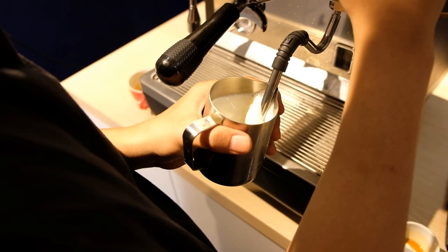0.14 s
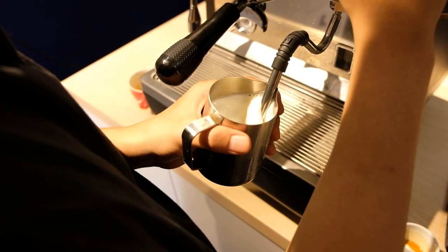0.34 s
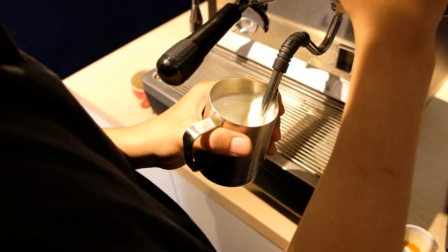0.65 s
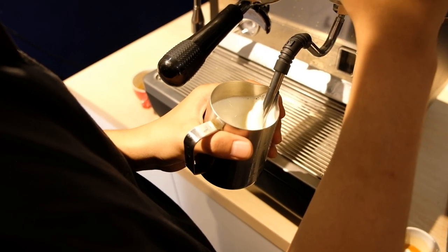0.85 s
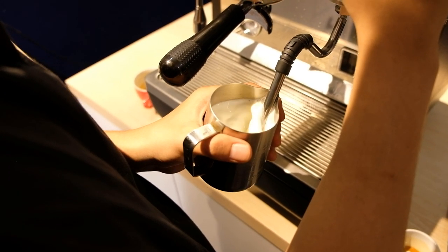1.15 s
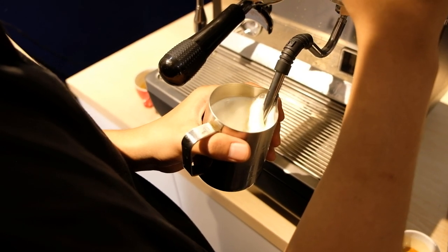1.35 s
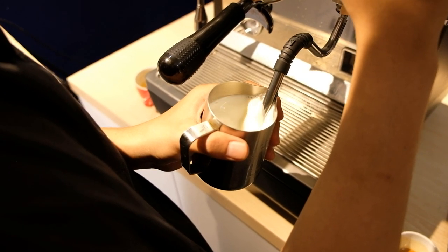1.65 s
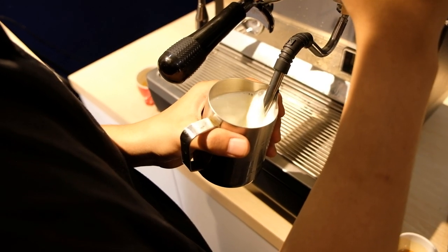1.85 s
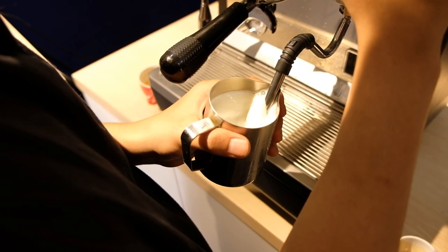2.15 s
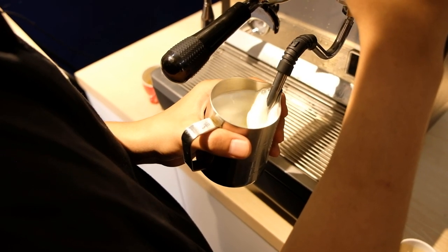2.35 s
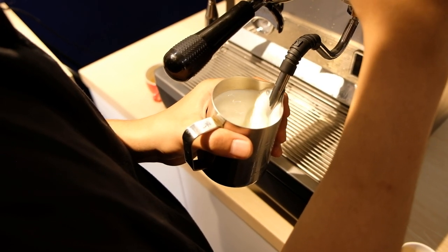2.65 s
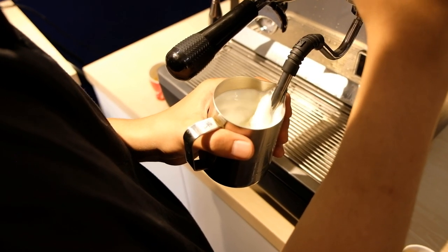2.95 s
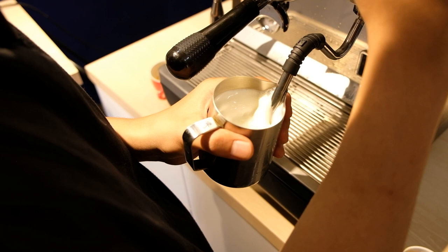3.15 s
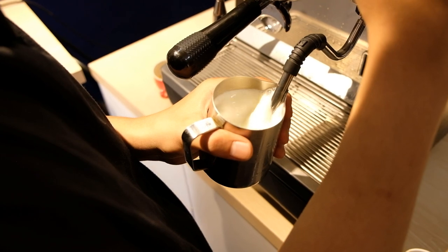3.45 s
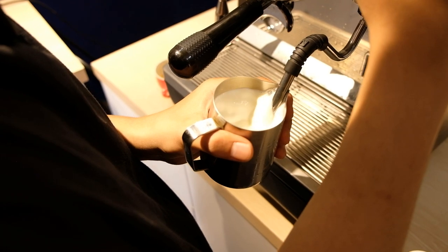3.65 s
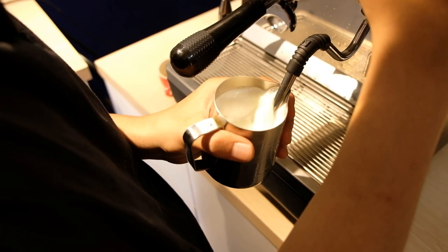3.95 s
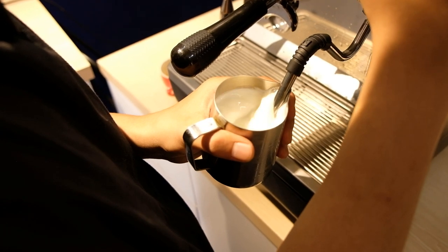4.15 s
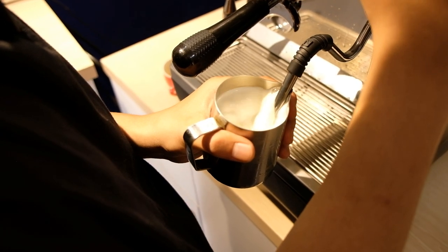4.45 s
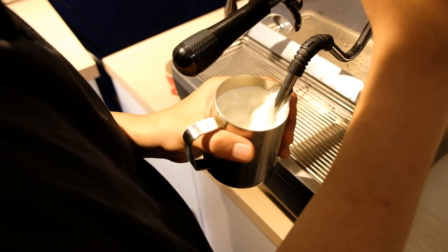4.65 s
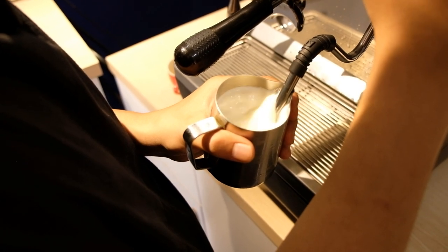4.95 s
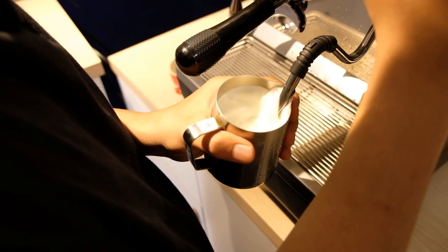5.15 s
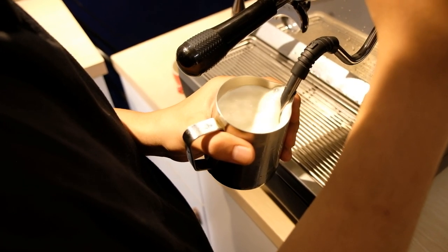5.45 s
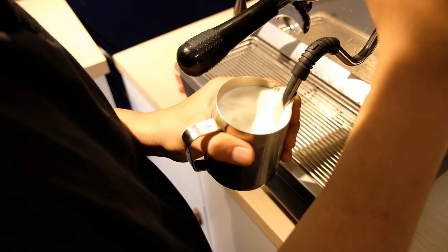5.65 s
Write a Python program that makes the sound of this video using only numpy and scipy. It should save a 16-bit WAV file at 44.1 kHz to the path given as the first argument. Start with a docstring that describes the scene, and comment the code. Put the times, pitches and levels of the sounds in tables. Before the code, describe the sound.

Milk being steamed in a steel jug: sharp sputtering bursts, a few gulps, then a continuous ringing rush that grows thicker.

```python
"""At first the tip of a steam wand breaks the surface of milk in a steel pitcher and spits bright, whistling hiss.
From about 1.5 s large bubbles gulp, fine spray decays and the milk closes over the tip; a squeak is heard.
The submerged jet roars throughout: collapsing bubbles ring the wall, and late on thick foam deepens the colour.
Two dull knocks fall near 3 s; faint ticks and squeaks come from 4.5 s on. Filtered noise makes a low rumble below,
with a wavering sine as mains hum and, until about 4 s, low gliding sines, perhaps traffic."""
import sys
import numpy as np
from scipy import signal
from scipy.fft import rfft, irfft
from scipy.io import wavfile
from scipy.ndimage import uniform_filter1d

SR = 44100
rng = np.random.default_rng(int(sys.argv[2]) if len(sys.argv) > 2 else 0)


def put_to_file(sound):
    """Save the sound as 16-bit audio at rate SR, in the file named by the first command-line argument."""
    columns = np.atleast_2d(sound).T  # one column per channel
    safe = np.clip(columns, -1, 1)
    whole_steps = np.round(safe * 32767)
    wavfile.write(sys.argv[1], SR, whole_steps.astype(np.int16))


N = 255780
T = np.arange(N) / SR  # time in s


def amp(db):
    """Level law: 20 dB is a factor of ten in amplitude."""
    return 10 ** (np.asarray(db) / 20)


def evened(x):
    """Normalisation to an rms of 1."""
    return x / np.sqrt(np.mean(x ** 2) + 1e-20)


def add(mix, s, sound):
    """Superposition: adds a sound to the mix from time s."""
    part = mix[round(s * SR):][:len(sound)]
    part += sound[:len(part)]


def curves(rows):
    """Linear interpolation of each column over time."""
    s, *columns = np.transpose(rows)
    return [np.interp(T, s, c) for c in columns]


def wander(top_hz):
    """Low-pass noise: random drift of rms 1 with little change faster than about top_hz."""
    hz = np.fft.rfftfreq(N, 1 / SR)
    drift = rfft(rng.standard_normal(N)) * np.exp(-(hz / top_hz) ** 2)
    return evened(irfft(drift, N))


# rings of the pitcher wall [f/Hz, width/Hz, lift/dB before the ring factor]
WALL = [(1270, 30, 1), (1398, 26, -0.5), (1450, 15, 3.5), (1530, 16, 0.5), (1780, 50, 1.5), (1643, 46, 3.5),
        (1730, 150, 1.5), (1934, 26, 2.5), (2970, 200, 0.5), (3765, 76, 8), (4720, 150, 3.5),
        (5320, 120, 8.5), (5630, 270, 6), (6280, 130, 4), (6820, 96, 9), (7240, 130, 2.5), (8210, 99, 3.5),
        (9640, 120, 4), (10300, 300, 0.5), (13100, 600, 2)]


def coloured(x, spectrum, above_hz=0, below_hz=SR, ring=1):
    """Linear filtering: a spectrum lifted at the wall's resonances, kept between two soft edges."""
    hz = np.fft.rfftfreq(N, 1 / SR)
    f, db = np.transpose(spectrum)
    db = np.interp(np.log(hz + 1), np.log(f + 1), db, -100, -100)
    db += ring * sum(lift / (1 + (2 * (hz - at) / width) ** 2) for at, width, lift in WALL)
    gain = amp(db)
    if above_hz or below_hz < SR:
        gain = gain * (1 + np.tanh((hz - above_hz) / 500)) * (1 + np.tanh((below_hz - hz) / 500))
    return evened(irfft(rfft(x) * gain, N))


def resonate(x, hz, width):
    """Heterodyne resonance: shifts the curve hz to zero, smooths by a double pole and shifts back."""
    turn = np.exp(2j * np.pi * np.cumsum(hz) / SR)
    r = np.exp(-np.pi * width / SR)
    smooth = signal.lfilter([1], [1, -2 * r, r * r], x / turn)
    return evened((turn * smooth).real)


def blotchy(x, patchy_db, bins=5, frames=12):
    """Time-frequency modulation: random patches, by default about 860 Hz wide and 17 ms long."""
    z = signal.stft(x, nperseg=256, noverlap=192)[2]
    patches = uniform_filter1d(rng.standard_normal(z.shape), size=bins, axis=0)
    patches = uniform_filter1d(patches, size=frames, axis=1)
    patched = z * amp(patchy_db * evened(patches))
    return evened(signal.istft(patched, nperseg=256, noverlap=192)[1][:N])


def bubbles(per_s, spread_db, flutter_db, flutter_hz):
    """Shot noise: bubble collapses of uneven size in a dense random train that flutters."""
    size = amp(spread_db * np.minimum(rng.exponential(1, N), 4)) * rng.standard_normal(N)
    happens = rng.random(N) < per_s / SR
    return size * happens * amp(flutter_db * wander(flutter_hz))


def room(x, t60):
    """Diffuse reverberation: a short decaying tail of energy 1 from the hard counter and walls."""
    t = np.arange(SR // 2) / SR
    tail = rng.standard_normal(len(t)) * amp(-60 * t / t60) * (t > .004)
    return signal.fftconvolve(x, tail / np.linalg.norm(tail))[:N]


def tones(rows, waver_db, waver_hz, fuzz):
    """Frequency modulation: gliding sines fade in and out and waver in strength and pitch."""
    out = np.zeros(N)
    for start, end, first_hz, last_hz, db in rows:
        way = np.clip((T - start) / (end - start), 0, 1)
        hz = (first_hz + (last_hz - first_hz) * way) * (1 + fuzz * wander(waver_hz))
        fade = 1.2 * np.sqrt(abs(np.sin(np.pi * way))) * (0 < way) * (way < 1)
        level = amp(db + waver_db * wander(waver_hz))
        out += fade * level * np.sin(2 * np.pi * np.cumsum(hz) / SR)
    return out


# colour of the rumble [f/Hz, relative level/dB per Hz]
RUMBLE = [(8.8, -26), (15, -8), (38, 2), (70, 1), (91, -3), (125, -6), (152, -3), (185, -9), (231, -10),
          (265, -13), (327, -25.5), (360, -17.5), (420, -17), (550, -15), (920, -120)]
# strength of the rumble [t/s, level/dB]
RUMBLE_LEVEL = [(0, -37.5), (1.0, -37), (1.7, -36.5), (2.3, -36.5), (3.05, -37), (3.7, -37), (4.1, -38),
                (5.8, -41)]


def rumble():
    """Broadband noise: low rumble of machines and street."""
    level = amp(curves(RUMBLE_LEVEL)[0] + 0.49 * wander(8.7))
    return level * coloured(rng.standard_normal(N), RUMBLE, ring=0)


# strength of the mains hum [t/s, rms level/dB before wavering]
HUM_LEVEL = [(0, -46.5), (1.2, -42.5), (3.5, -48.5), (4.1, -50), (5.8, -51.5)]
HUM_HZ = 99


def hum():
    """Periodic excitation: the hum of the mains as one sine, wavering in level and phase."""
    level = np.sqrt(2) * amp(curves(HUM_LEVEL)[0] + 2.5 * wander(2.2))
    return level * np.sin(2 * np.pi * HUM_HZ * T + .3 * wander(2.2))


# low tones that creep upward [start t/s, end t/s, first f/Hz, last f/Hz, level/dB]
ENGINE = [(0, .6, 140, 158, -52), (.68, 1.42, 161, 184, -40.5), (.8, 1.35, 224, 232, -47),
          (1.5, 1.85, 178, 190, -49), (1.9, 2.7, 194, 202, -51), (0, .55, 217, 226, -43),
          (1.6, 3.2, 233, 248, -52), (.8, 1.15, 325, 340, -49), (2.8, 3.9, 315, 345, -54),
          (3.4, 4.1, 218, 229, -49)]


def cafe():
    """Superposition of the background: rumble, hum and low gliding tones."""
    return rumble() + hum() + tones(ENGINE, 0.83, 4.5, fuzz=0.00438)


# faint squeaks [start t/s, end t/s, first f/Hz, last f/Hz, level/dB]
SQUEAKS = [(1.488, 1.518, 3850, 3600, -34), (5.47, 5.505, 4800, 4950, -43),
           (4.775, 4.795, 14100, 15100, -68), (4.8, 4.818, 14200, 14800, -69),
           (4.8, 4.835, 13700, 14700, -68), (4.808, 4.842, 12800, 13600, -66),
           (4.86, 4.93, 12800, 12600, -71), (4.93, 4.965, 14600, 14300, -70),
           (4.95, 4.99, 13200, 12000, -65), (4.975, 4.99, 14700, 14200, -68),
           (4.982, 5.075, 12300, 11050, -63), (4.97, 5.04, 15200, 14150, -62),
           (5.03, 5.055, 14650, 13850, -62), (5.045, 5.098, 14300, 12700, -63)]


def squeaks():
    """Narrow-band sound: short gliding sines whose level and pitch waver fast."""
    return tones(SQUEAKS, 4.1, 120, fuzz=0.0045)


# dull knocks through the counter [t/s, level/dB, f/Hz]
THUMPS = [(3.029, -18.5, 47.5), (3.128, -24, 63)]


def thumps():
    """Damped oscillation: each knock is a low sine under a quick swell and decay."""
    out, u = np.zeros(N), np.arange(1800) / SR
    for s, db, hz in THUMPS:
        swell = u / 0.011 * np.exp(1 - u / 0.0082)
        taper = np.cos(np.pi * u / u[-1] / 2)
        add(out, s, amp(db) * swell * np.sin(2 * np.pi * hz * u) * taper)
    return out


# tiny droplets bursting [t/s, level/dB]
TICKS = [(4.5827, -34), (4.6134, -44)]


def ticks():
    """Impulsive radiation: each droplet is decaying noise without its lows and extreme highs."""
    out, u = np.zeros(N), np.arange(1800) / SR
    for s, db in TICKS:
        noise = np.convolve(rng.standard_normal(len(u)), [.6, 0, -.6], "same")
        add(out, s, amp(db) * np.exp(-u / .0012) * noise)
    return out


# large bubbles gulping under the surface [t/s, level/dB, f/Hz]
GULPS = [(1.555, -26, 843), (1.586, -34, 800), (1.602, -24, 834), (1.634, -27, 824), (1.664, -36, 890),
         (2.599, -30, 890), (2.63, -28.5, 860)]
# partials of a gulp [multiple of its pitch, level/dB]
GULP_RINGS = [(.62, -5.5), (1.0, 1), (1.4, -3.5)]
GULP_BLURT_DB = -9  # wet noise around the rings


def gulps():
    """Bubble resonance: big bubbles ring briefly with rising pitch."""
    out, u = np.zeros(N), np.arange(1800) / SR
    for s, db, hz in GULPS:
        ring = sum(amp(lift_db) * np.sin(2 * np.pi * k * hz * u * (1 + 1.6 * u)) for k, lift_db in GULP_RINGS)
        ring += amp(GULP_BLURT_DB) * resonate(rng.standard_normal(len(u)), hz + 0 * u, 700)
        add(out, s, amp(db) * u / 0.005 * np.exp(1 - u / 0.004) * ring)
    return out


# steam escaping at the surface [t/s, level/dB]
LEAK = [(0, -33.5), (.1, -40), (.13, -39), (.22, -35.5), (.33, -42.5), (.6, -40), (.8, -43), (.97, -41.5),
        (1.098, -30), (1.16, -34), (1.228, -28), (1.262, -27), (1.306, -28), (1.37, -29.5), (1.415, -42),
        (1.45, -31), (1.525, -34), (1.56, -38), (1.75, -66), (1.9, -90)]
LEAK_BRIGHT_DB, LEAK_BRIGHT_PER_DB, LEAK_SIZZLE_DB = -12, 0.5, -9  # louder steam is brighter
# spits as the tip tears open the surface
# [t/s, level/dB, length/s, brightness/dB, sizzle above about 10 kHz/dB]
SPITS = [(0.005, -45, 0.015, 9, -8), (0.033, -40, 0.012, 13, -17), (0.11, -40, 0.014, -18, -8),
         (.127, -38, 0.0091, -5, -4), (.139, -21.5, .011, -2, 4.5), (0.151, -16.5, 0.0096, 6, -3),
         (0.169, -29.5, 0.018, -18.5, -5), (0.2, -33, .0091, -21, -5), (0.214, -39, 0.024, -21, -10),
         (0.232, -39, 0.014, -16, -8), (0.25, -43, 0.016, -23, -8), (0.277, -47, 0.01, -20, -8),
         (0.308, -46, 0.012, -15, -8), (0.895, -44, .014, -14, -11), (0.929, -38, .014, -6, -14),
         (0.973, -36, 0.024, 3, -9), (1.02, -41, 0.014, -6, -12), (1.0575, -25, 0.016, -7, -16),
         (1.07, -27, 0.013, 5, -6), (1.084, -30, 0.019, 7, -7), (1.112, -19.5, 0.021, -1, -6),
         (1.145, -17.5, 0.0089, 8, -2), (1.172, -19, 0.02, 2, -3), (1.189, -23, 0.024, 0, -2),
         (1.22, -21, 0.012, 2, -4), (1.229, -25, 0.016, -8, 0), (1.27, -16.5, 0.011, -2, -7),
         (1.285, -24, 0.016, 0, -3), (1.3, -24.5, 0.011, 2, -6), (1.312, -22.5, 0.016, 13, 0),
         (1.33, -26, 0.01, 0, -1), (1.339, -20.5, 0.01, -6, 3), (1.39, -18, 0.013, 2, -0.5),
         (1.424, -25, .0086, 9, -9), (1.435, -21, 0.012, -6, -2), (1.451, -24, 0.0096, 2, -3),
         (1.463, -15, 0.0076, -3, -8), (1.478, -21, 0.014, 3, -2), (1.497, -16, 0.014, 6, -11),
         (1.514, -14.5, 0.01, 2, -5), (5.475, -45, 0.028, -12, -8)]


def spits():
    """Amplitude envelopes: strength of the escaping steam in its dull, bright and sizzling part."""
    leak_db = curves(LEAK)[0]
    lit_db = leak_db + LEAK_BRIGHT_DB + LEAK_BRIGHT_PER_DB * (leak_db + 26.0)
    dull, bright, sizzle = amp(leak_db), amp(lit_db), amp(lit_db + LEAK_SIZZLE_DB)
    for s, db, length, bright_db, sizzle_db in SPITS:
        u = np.arange(round(3 * length * SR)) / SR
        opening = np.tanh((u / (0.005 + 0.73 * length)) ** 1.28)  # the surface tears open
        shape = opening / (1 + (u / (length + 0.0014)) ** 6.3)  # and is sealed by milk
        add(dull, s - .003, amp(db - bright_db / 2) * shape)
        add(bright, s - .003, amp(db + bright_db / 2 - 2.0) * shape)
        add(sizzle, s - .003, amp(db + bright_db / 2 + sizzle_db) * shape)
    return dull, bright, sizzle


# colour of the spray [f/Hz, relative level/dB per Hz]
SPRAY = [(2000, -30), (3200, 0), (5000, -3), (7500, -3), (10000, -13), (15600, -24)]
SPRAY_S, SPRAY_DB, SPRAY_T60 = 1.525, -25, 0.33  # start in s, level, time in s to fall by 60 dB


def spray():
    """Exponential decay: fine spray falls back as the tip sinks."""
    after = np.maximum(T - SPRAY_S, 0)
    level = amp(SPRAY_DB - 60 * after / SPRAY_T60 + 1.7 * wander(60))
    return np.tanh(after / 0.0054) * level * coloured(bubbles(12000, 2.5, 1.5, 80), SPRAY, ring=0)


# colour of the hiss [f/Hz, relative level/dB per Hz]
HISS = [(2290, -45), (3900, -26), (4400, -11), (4700, 0), (5150, -6), (5500, -3.5), (5820, 5.5), (6200, -2),
        (6700, -5.5), (7460, -13), (8300, -9.5), (8900, -10), (9630, -7.5), (10200, -11), (10700, -17),
        (11250, -12), (11800, -18), (12400, -12), (12950, -17), (13600, -16), (14300, -19), (15600, -34)]
# rough whistle of the gap at the tip as it opens [t/s, f/Hz, level/dB against the dull hiss]
WHISTLE = [(0, 4600, -2), (.05, 4720, -8), (.12, 4740, -0.5), (.25, 4700, -3), (.32, 4750, -8),
           (.44, 4750, -12), (.56, 4640, 3.5), (.68, 4780, -12), (.86, 4780, -14), (.91, 4740, 0),
           (1.06, 4650, 0), (1.12, 4760, -7), (1.18, 4640, 2), (1.25, 4700, -5), (1.34, 4720, -0.5),
           (1.38, 4680, -6), (1.44, 4680, 1), (1.49, 4640, -3), (1.53, 4680, -4), (1.6, 4720, -14)]
# shrill upper band of the whistle [t/s, f/Hz]
SHRILL = [(.03, 9450), (.14, 9500), (.16, 9950), (.95, 9800), (1.05, 9000), (1.1, 9300), (1.15, 9700),
          (1.26, 9500), (1.35, 9800), (1.4, 9300), (1.43, 9750), (1.46, 9400), (1.5, 10300), (1.53, 9950)]


def surface(dull, bright, sizzle):
    """Turbulence noise: leaking steam and sharp spits share one sputtering hiss in three parts."""
    sputter = amp(1.3 * wander(170))
    hiss = dull * blotchy(coloured(bubbles(16000, 0.29, 1.7, 110), HISS, below_hz=7800), patchy_db=1.6)
    whistle_hz, whistle_db = curves(WHISTLE)
    waver = 1 + .008 * wander(30)  # shared by both whistling bands
    whistle = resonate(bubbles(12000, 1.5, 1.2, 90), whistle_hz * waver, 290)
    hiss += dull * amp(whistle_db + 1.5 * wander(45)) * whistle
    treble = bright * coloured(bubbles(18000, 4.7, 0.97, 120), HISS, 7030, 11900)
    treble += amp(-2.5) * bright * resonate(rng.standard_normal(N), curves(SHRILL)[0] * waver, 800)
    treble += sizzle * coloured(bubbles(20000, 3.3, 0.87, 120), HISS, above_hz=10260)
    torn = blotchy(treble, 2.4, bins=8, frames=7) * np.std(treble)
    hiss = sputter * (hiss + torn) + spray()
    return hiss + amp(-8.0) * room(hiss, 0.27)


# thickening of the milk [t/s, share of thick foam 0-1]
FOAM = [(0, 0.26), (2.6, 0.01), (4.0, 0.25), (5.0, 0.68), (5.3, 0.82), (5.8, 1)]


def foaming(x, thin, thick):
    """Crossfade: the colour moves between that of thin milk and that of thick foam."""
    foam = np.clip(curves(FOAM)[0], 0, 1)
    return (1 - foam) * coloured(x, thin) + foam * coloured(x, thick)


# depth of the tip [t/s, nearness to the surface 0-1]
SHALLOW = [(0, 0.95), (1.55, 0.9), (1.8, 0.47), (3.0, 0.06), (3.6, 0), (5.8, 0)]
# regions around the roar
# [name: level in thin milk/dB, gain with a shallow tip/dB, gain in thick foam/dB]
REGIONS = dict(deep=(-37.5, 2.7, 17.7), churn=(-40, -1.25, 5.1), fizz=(-41, 2.4, -2.9), fine=(-46.5, 4, .5),
           air=(-66, 0, 4))


def region_level(name):
    """Loading of the source: tip depth and foam set the level of a region."""
    db, up_db, foam_db = REGIONS[name]
    return amp(db + curves(SHALLOW)[0] * up_db + curves(FOAM)[0] * foam_db)


# core of the submerged jet [t/s, level/dB]
JET = [(0, -22), (.1, -27.5), (.25, -27.5), (.4, -26.5), (.85, -25), (1.0, -21), (1.25, -20.5), (1.35, -22),
       (1.42, -19.5), (1.62, -25), (1.82, -23), (1.95, -22), (2.2, -19.5), (2.48, -25), (2.9, -21.5),
       (3.05, -22.5), (3.2, -19), (3.45, -20.5), (3.65, -18), (3.95, -20.5), (4.45, -16), (4.75, -15.5),
       (5.1, -15.5), (5.35, -17.5), (5.6, -16.5), (5.8, -16.5)]
# brief surges (+) and chokes (-) of the jet [t/s, level/dB]
SURGES = [(1.71, 7.5), (2.371, 7.5), (2.527, 6.5), (2.56, 8.5), (2.6, -3), (2.62, 3.5), (4.09, 6.5),
          (4.22, 2), (4.62, -4), (4.67, 4), (4.94, -4), (4.952, -1)]
SURGE_S, PUFF_DB, PUFF_HZ = 0.014, .5, 29.8  # half length of a surge; depth and speed of random puffing
# colour of the core in thin milk and in thick foam [f/Hz, relative level/dB per Hz]
ROAR = [(850, -43.5), (1450, -13), (1530, -15), (1720, -3), (1840, 0.5), (1960, 0.5), (2200, -7),
        (2300, -18), (2990, -28.5), (5060, -120)]
ROAR_FOAM = [(850, -34), (1450, -10), (1540, -7), (1760, 1.5), (1840, 2.5), (1990, -0.5), (2160, -7),
             (2300, -8.5), (2990, -41), (5060, -120)]
# colour below the core [f/Hz, relative level/dB per Hz]
DEEP = [(620, -66), (1050, -21), (1110, -18.5), (1340, -3), (1540, -3), (1700, -9.5), (2210, -62),
        (3740, -120)]


def core():
    """Cavitation noise: collapsing bubbles give the core of the roar and a deeper band."""
    surges_db = sum(db * np.exp(-((T - s) / SURGE_S) ** 2) for s, db in SURGES)
    core_db = curves(JET)[0] + PUFF_DB * wander(PUFF_HZ) + surges_db
    roar = amp(core_db) * foaming(bubbles(12000, 0.83, 1.0, 39), ROAR, ROAR_FOAM)
    return roar + region_level("deep") * coloured(bubbles(9000, 0.41, 0.94, 40), DEEP)


# colour of the churning in thin milk and in thick foam [f/Hz, relative level/dB per Hz]
CHURN = [(190, -46), (330, -4.5), (355, -21), (443, -13.5), (477, -8.5), (613, -5), (689, -11), (856, -0.5),
         (989, -4.5), (1250, -3.5), (1620, -46), (2750, -120)]
CHURN_FOAM = [(190, -34), (330, -16), (392, -19.5), (456, -14.5), (609, -3), (700, -13.5), (951, -2),
              (1110, -16.5), (1250, -7), (1620, -42), (2750, -120)]
SPLASH_S, SPLASH_DB, SPLASH_LENGTH_S = 1.6, 7, 0.057  # the milk closes over the tip
CHURN_PER_JET_DB = 0.3455  # a stronger jet churns the milk harder


def churning():
    """Momentum transfer: the jet stirs a low bubbling that swells once in a splash."""
    splash = amp(SPLASH_DB * np.exp(-((T - SPLASH_S) / SPLASH_LENGTH_S) ** 2))
    drive = amp(CHURN_PER_JET_DB * (curves(JET)[0] + 23.0))
    return region_level("churn") * splash * drive * foaming(bubbles(3500, 0.63, 0.43, 25), CHURN, CHURN_FOAM)


# upper flank of the roar [t/s, bright shoulder level/dB, upper edge level/dB]
FLANK = [(0, -27.5, -33.5), (.1, -30, -32.5), (.19, -22, -31), (.32, -28.5, -35.5), (.75, -27.5, -34.5),
         (1.1, -25.5, -44), (1.4, -28, -32), (1.75, -24, -45.5), (2.2, -30, -37), (3.0, -31.5, -44),
         (3.65, -33.5, -47), (4.2, -33, -40), (4.55, -32, -40), (4.66, -34, -34), (4.78, -32.5, -40),
         (4.9, -34, -32.5), (5.08, -39, -38), (5.15, -31, -31.5), (5.4, -32, -32.5), (5.55, -29, -36),
         (5.8, -27, -36)]
# colours of shoulder and edge [f/Hz, relative level/dB per Hz]
BRIGHT = [(1210, -69), (2050, 6.5), (2120, 2), (2300, 10.5), (2420, 10), (2750, -1), (3580, -37),
          (6050, -120)]
EDGE = [(1440, -57), (2450, -8), (2600, 4.5), (2770, 3.5), (2880, 1.5), (2960, -2.5), (3080, -3.5),
        (3340, -7), (3500, -35), (4550, -45), (7700, -120)]
SPILL_EDGE_DB = -6  # share of the escaping steam


def flank(spill):
    """Spectral roll-off: a bright shoulder and an upper edge, which escaping steam also stirs."""
    bright_db, edge_db = curves(FLANK)
    shoulder = amp(bright_db) * coloured(bubbles(12000, 3.7, 0.75, 32), BRIGHT)
    edge_level = np.hypot(amp(edge_db), amp(SPILL_EDGE_DB) * spill)
    return shoulder + edge_level * coloured(bubbles(12000, 4.0, 1.0, 37), EDGE)


# air space above the milk [t/s, f/Hz, level/dB]
HOLLOW = [(0, 4070, -75), (1.8, 3900, -57), (2.6, 3900, -52), (3.3, 4160, -43), (4.0, 3870, -41.5),
          (4.5, 3690, -42.5), (4.9, 3320, -40.5), (5.3, 4000, -45), (5.8, 3670, -48)]
# a second band that opens in thick foam [t/s, f/Hz, level/dB]
UPPER_BAND = [(0, 2830, -80), (4.9, 2850, -60), (5.05, 2930, -42), (5.2, 2840, -35), (5.4, 2830, -34),
              (5.5, 2700, -36), (5.6, 2680, -29), (5.8, 2800, -31)]


def hollows():
    """Cavity resonance: bubble noise excites two moving bands."""
    upper_hz, upper_db = curves(UPPER_BAND)
    hollow_hz, hollow_db = curves(HOLLOW)
    upper = amp(upper_db) * resonate(bubbles(10000, 1.7, 1.4, 35), upper_hz, 260)
    return upper + amp(hollow_db) * resonate(bubbles(11000, 0.92, 0.9, 40), hollow_hz, 820)


# colour of the fizz [f/Hz, relative level/dB per Hz]
FIZZ = [(1940, -24), (3300, -2.5), (4510, -2), (4940, 3.5), (5510, -14), (6270, -5.5), (6740, -16.5),
        (7330, -11), (8400, -19), (10100, -19), (15600, -44)]
# smooth top of the hiss [f/Hz, relative level/dB per Hz]
AIR = [(9000, -18), (11500, -1), (13000, -1), (15600, -2)]
SPILL_FIZZ_DB, SPILL_FINE_DB = -8, -9  # shares of the escaping steam


def fizzing(spill):
    """Shot noise in the treble: patchy coarse and fine fizz, stirred by escaping steam, under smooth air."""
    fizz_level = np.hypot(region_level("fizz"), amp(SPILL_FIZZ_DB + 1.9 * wander(19)) * spill)
    fizz = coloured(bubbles(15000, 0.65, 0.55, 60), FIZZ, below_hz=5630, ring=0.57)
    fine_level = np.hypot(region_level("fine"), amp(SPILL_FINE_DB) * spill)
    fine = coloured(bubbles(15000, 0.96, 0.93, 30), FIZZ, above_hz=5220)
    air = region_level("air") * coloured(rng.standard_normal(N), AIR, ring=0)
    return fizz_level * blotchy(fizz, patchy_db=0.96) + fine_level * blotchy(fine, patchy_db=0.8) + air


SPILL_S = .03  # smoothing time of the escaping steam


def jet(escape):
    """Forced resonance: bubble collapses ring the pitcher; each region flutters partly on its own."""
    spill = np.sqrt(abs(uniform_filter1d(escape ** 2, round(SPILL_S * SR))))
    gust = amp(.5 * wander(22))  # the jet wobbles and all regions follow
    roar = gust * (core() + churning() + flank(spill) + hollows() + fizzing(spill))
    return roar + amp(-10) * room(roar, 0.14)


def scene():
    """Superposition of all sources, from the background to the jet."""
    dull, bright, sizzle = spits()
    small_sounds = squeaks() + thumps() + ticks() + gulps()
    mix = cafe() + small_sounds + surface(dull, bright, sizzle) + jet(dull)
    return mix[None]


EDGE_HZ = 15740  # upper band limit


def record(dry):
    """Saturation and band limiting: the loudest peaks are softly rounded, then low-passed."""
    rounded = 1.1 * np.tanh(dry / 1.1)
    lowpass = signal.firwin(1023, EDGE_HZ, window=("kaiser", 10), fs=SR)
    return signal.oaconvolve(rounded, lowpass[None], "same")


dry = scene()
out = record(dry)
put_to_file(out)
```